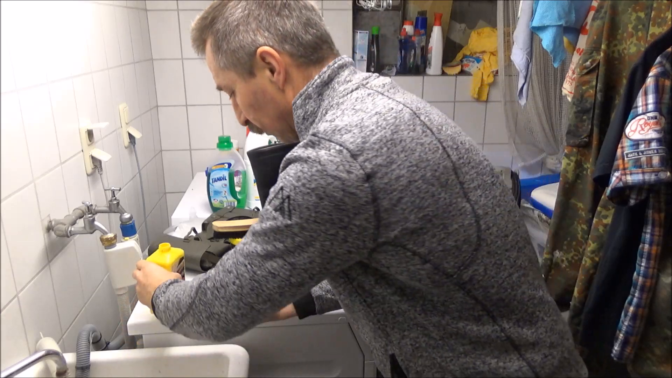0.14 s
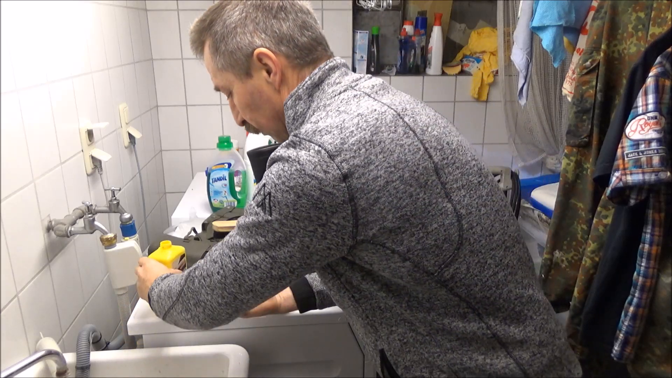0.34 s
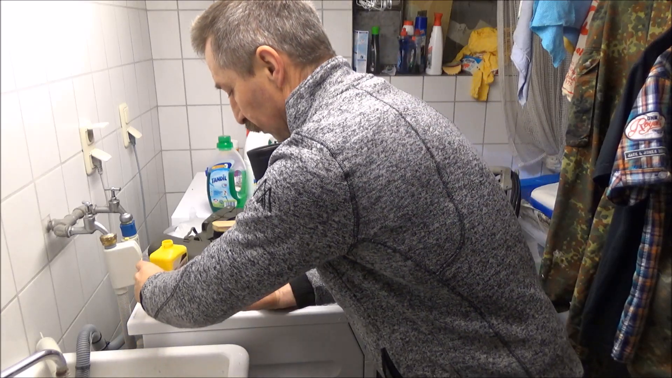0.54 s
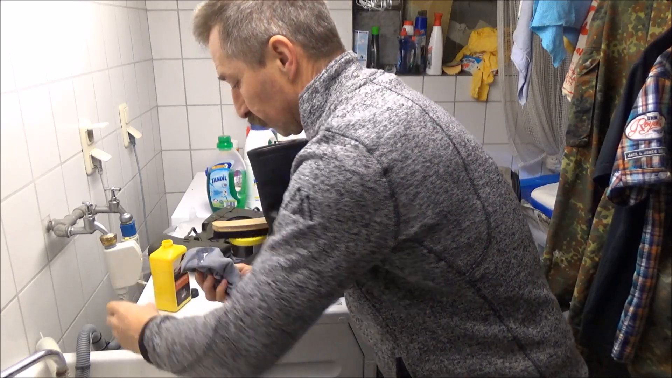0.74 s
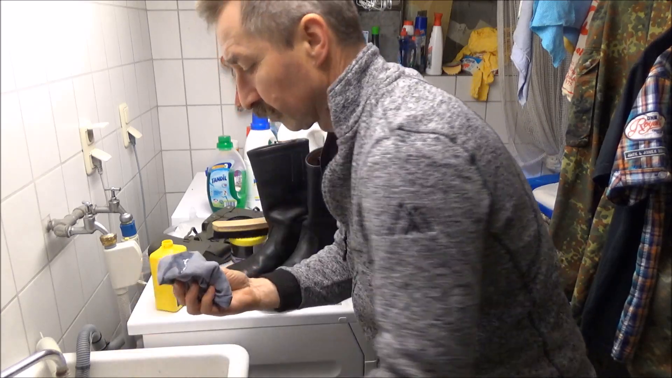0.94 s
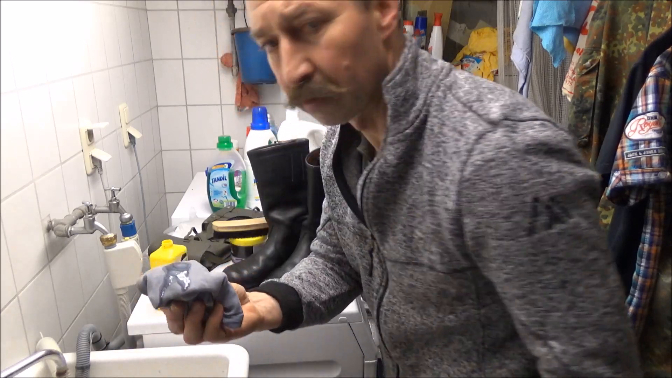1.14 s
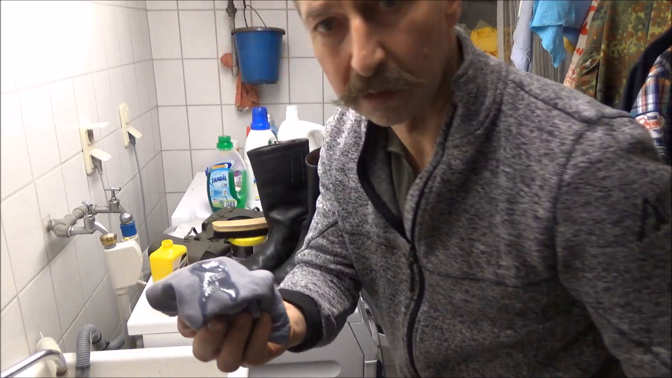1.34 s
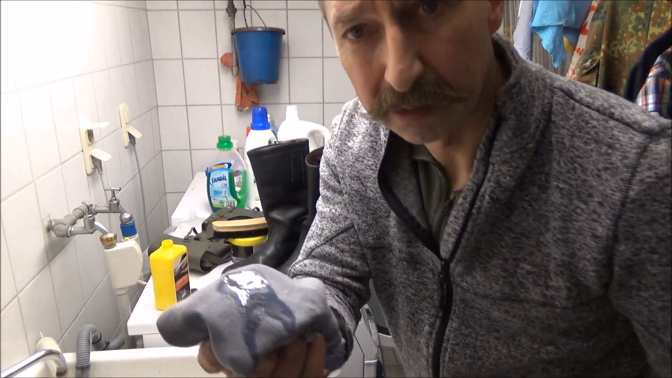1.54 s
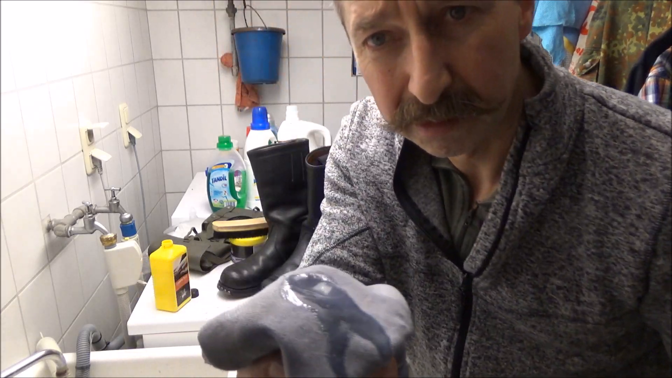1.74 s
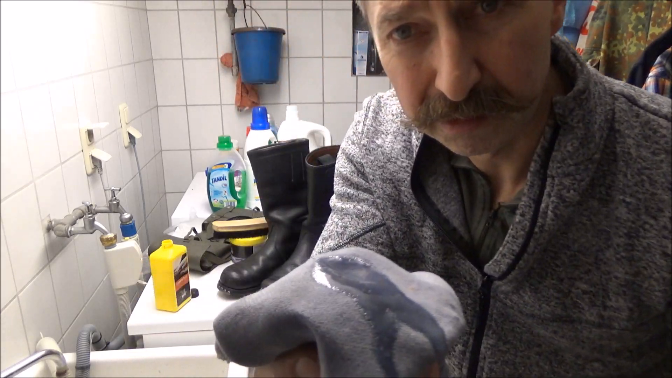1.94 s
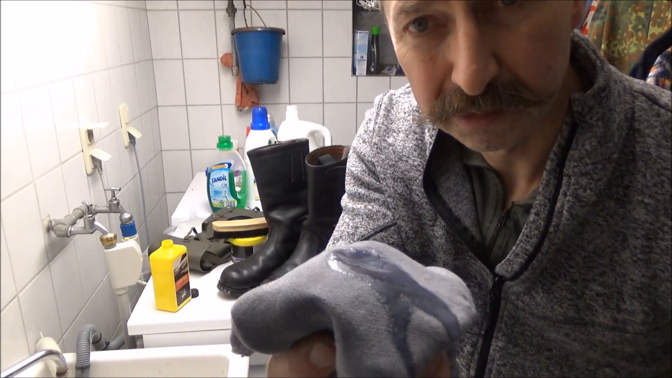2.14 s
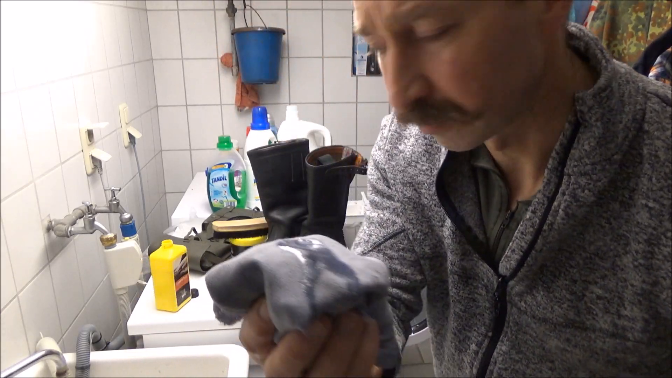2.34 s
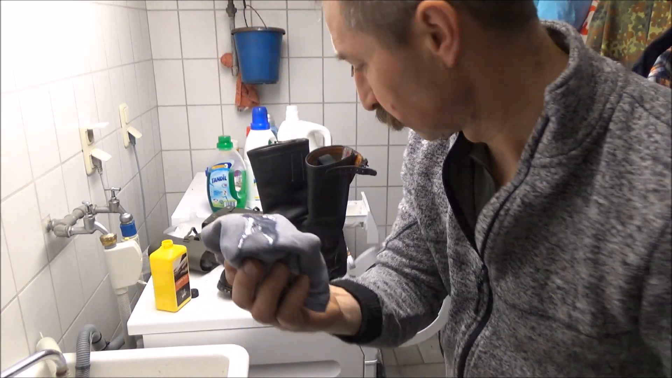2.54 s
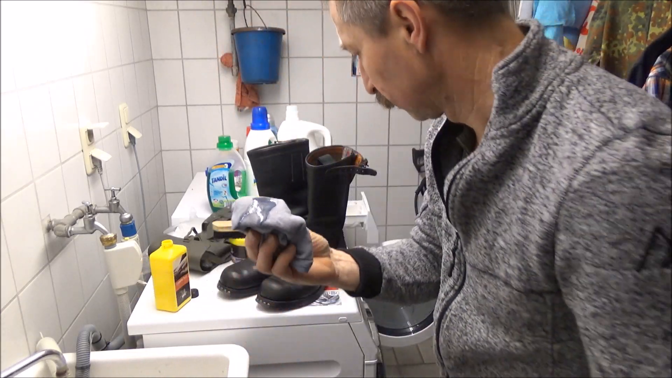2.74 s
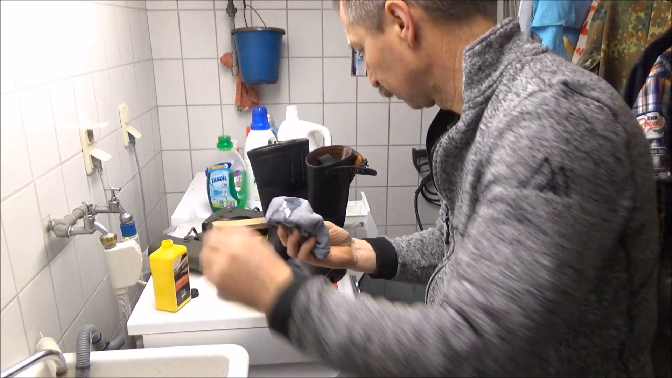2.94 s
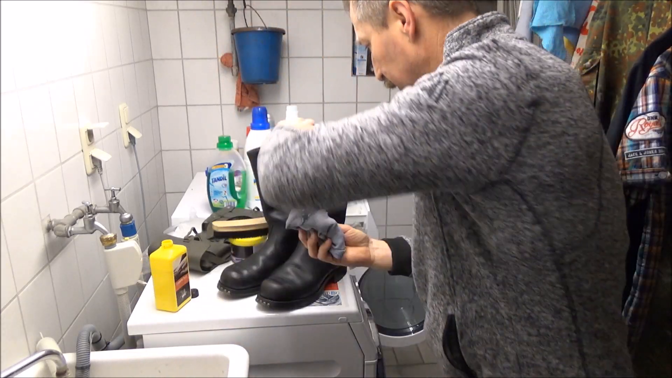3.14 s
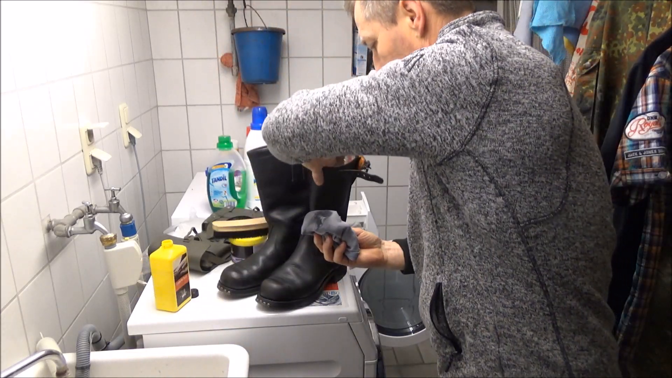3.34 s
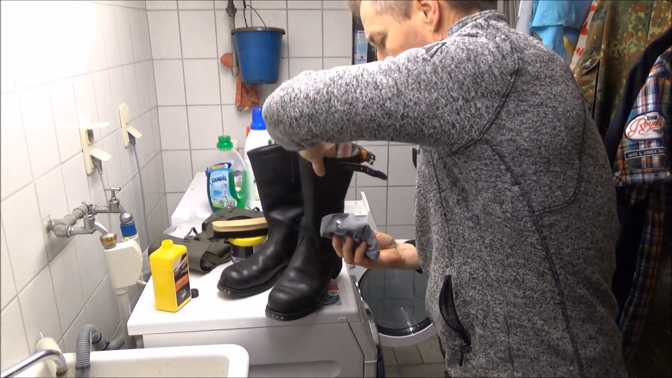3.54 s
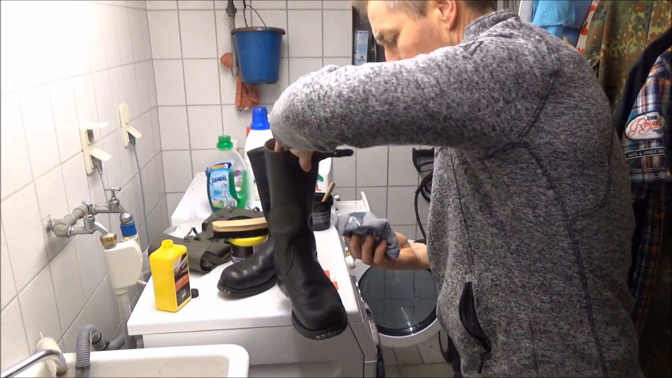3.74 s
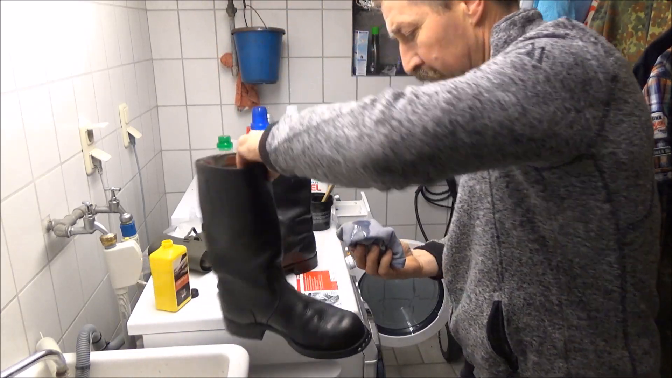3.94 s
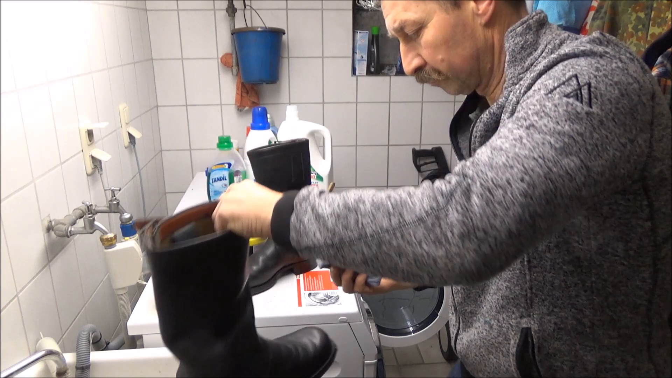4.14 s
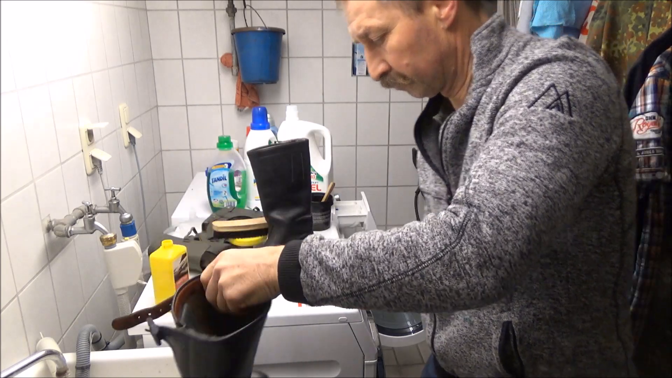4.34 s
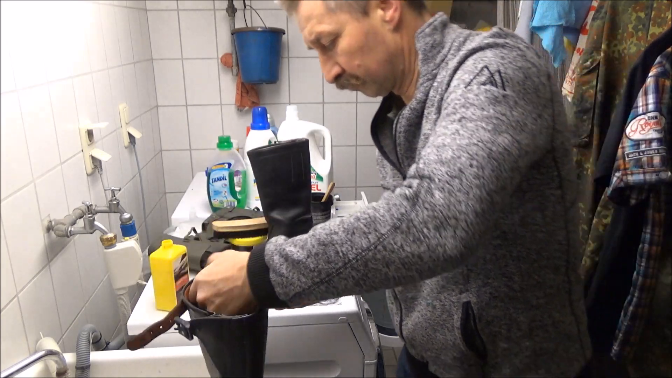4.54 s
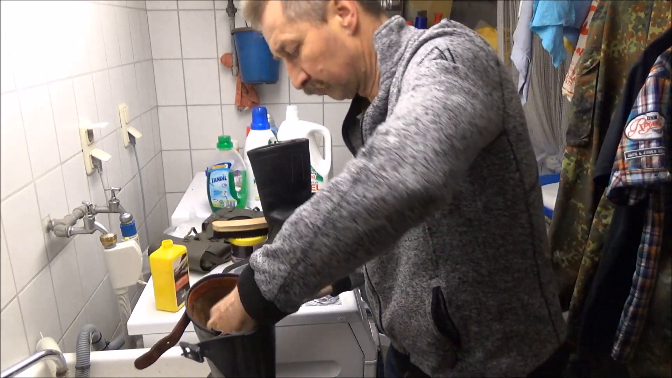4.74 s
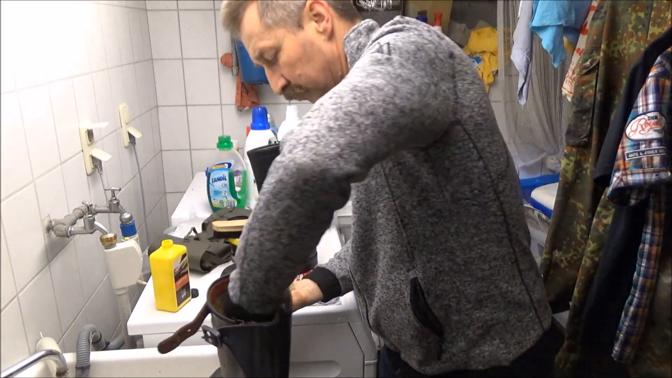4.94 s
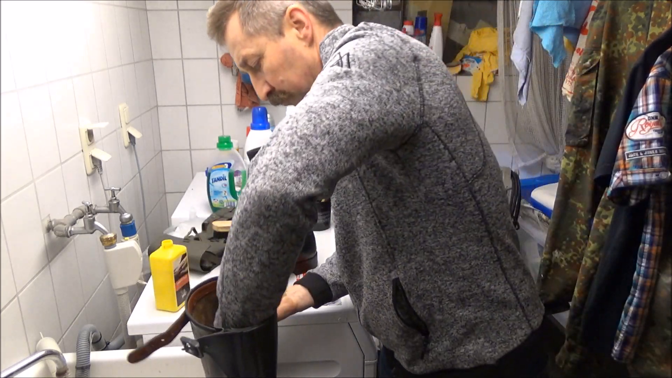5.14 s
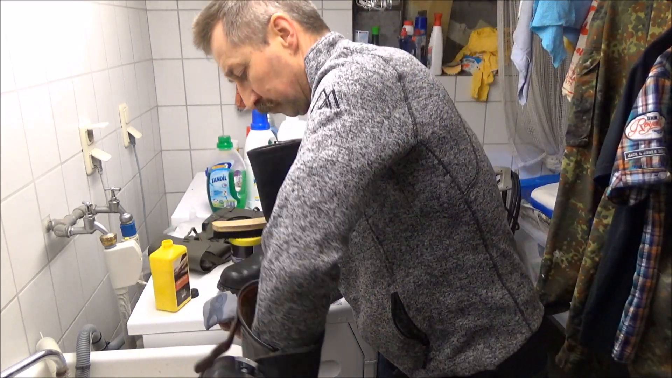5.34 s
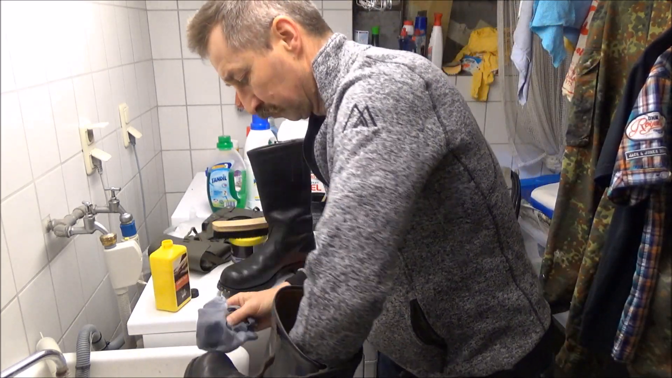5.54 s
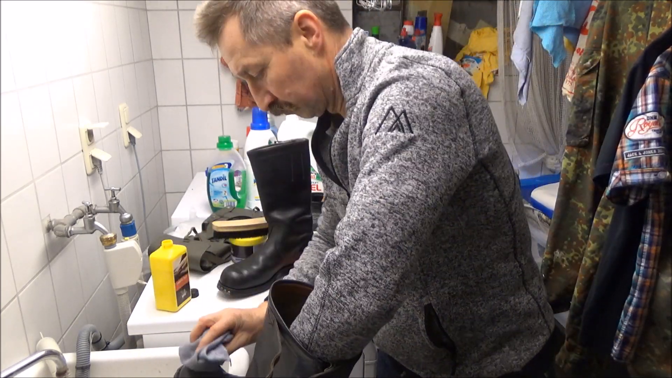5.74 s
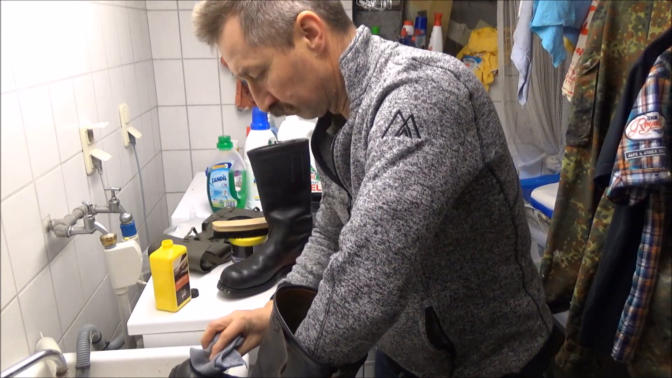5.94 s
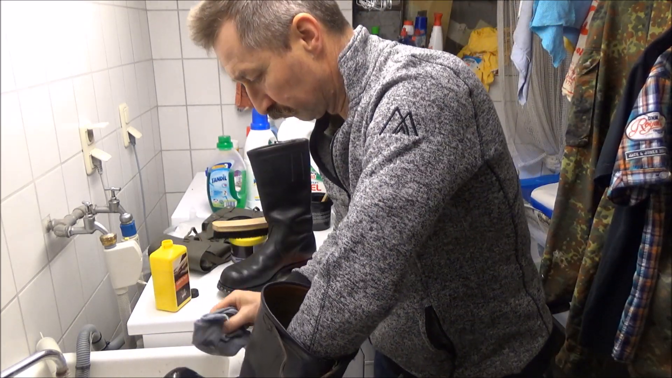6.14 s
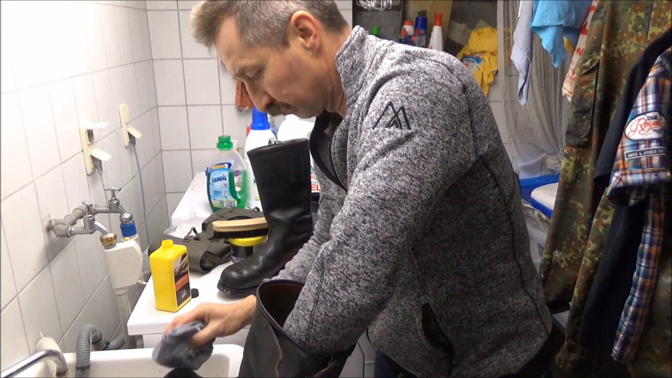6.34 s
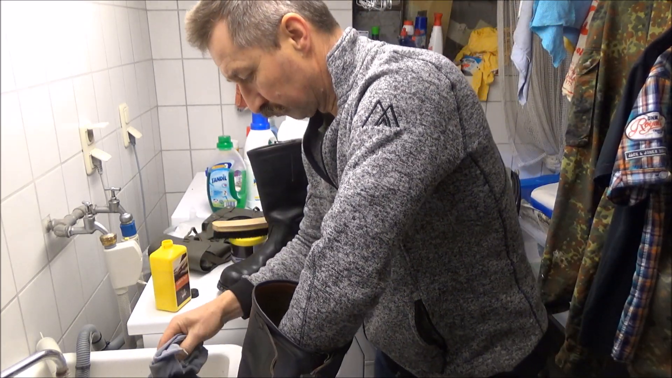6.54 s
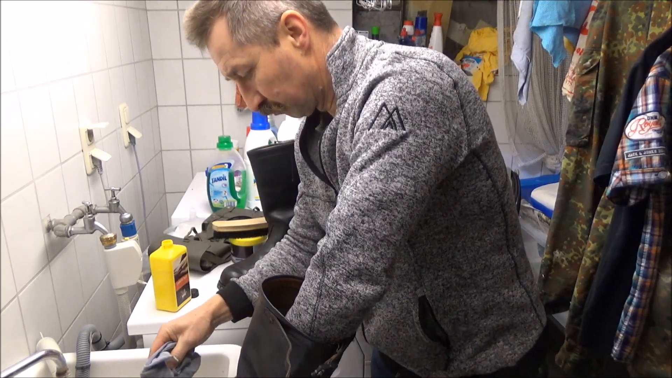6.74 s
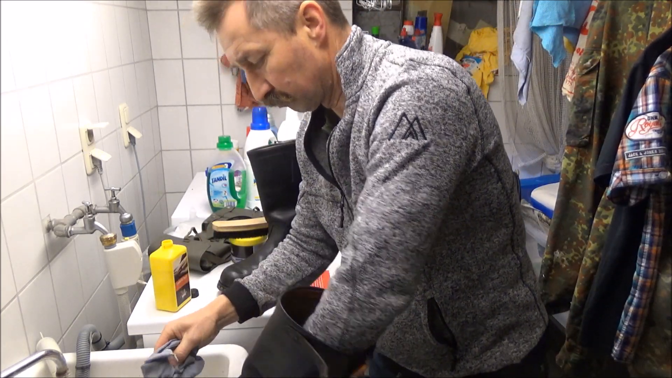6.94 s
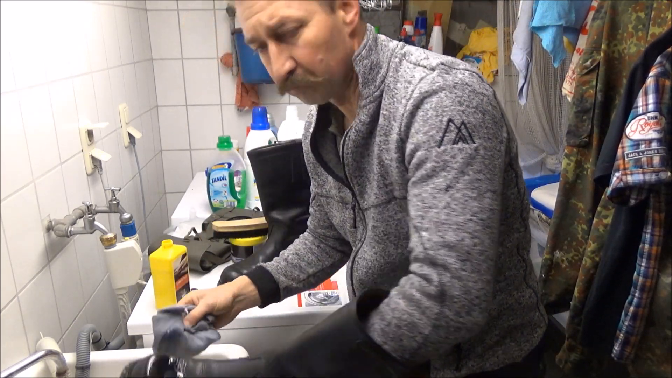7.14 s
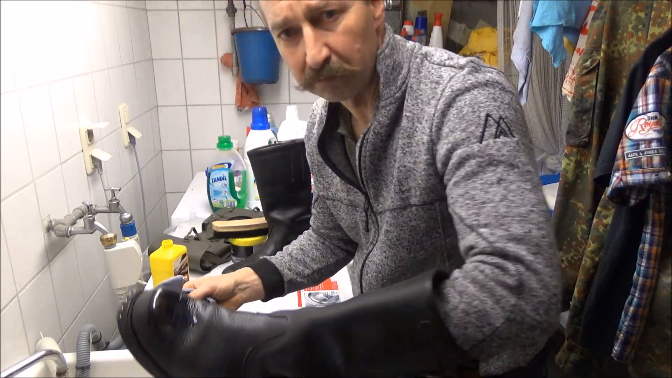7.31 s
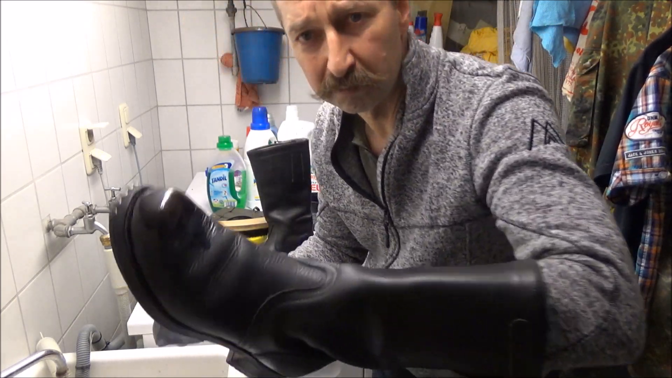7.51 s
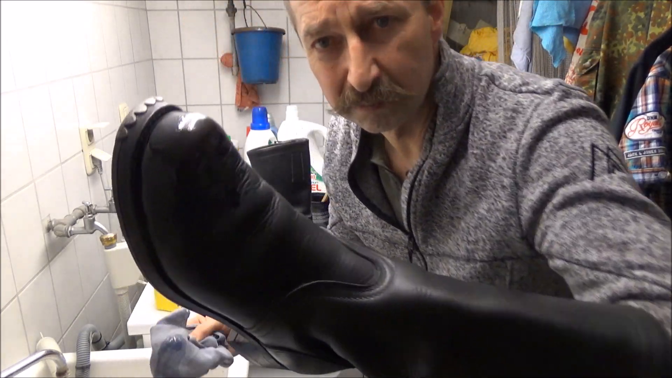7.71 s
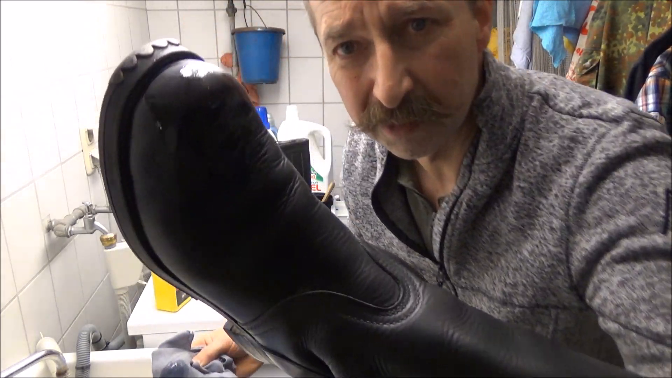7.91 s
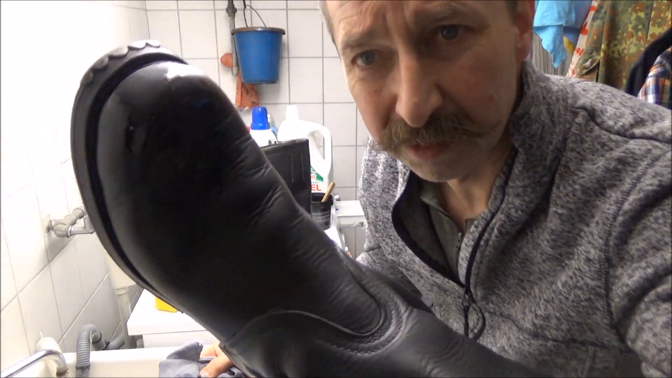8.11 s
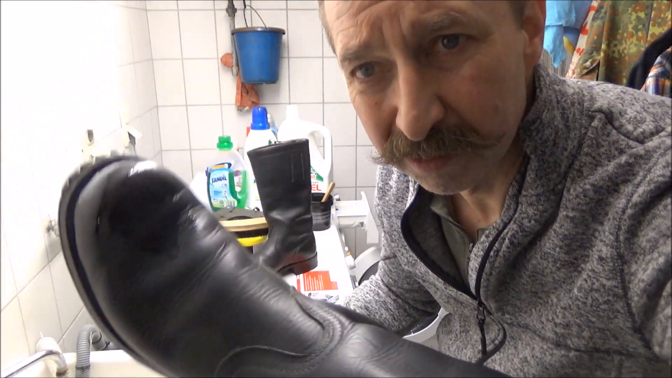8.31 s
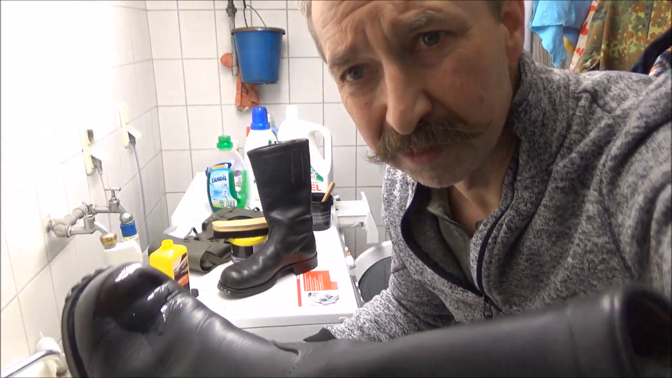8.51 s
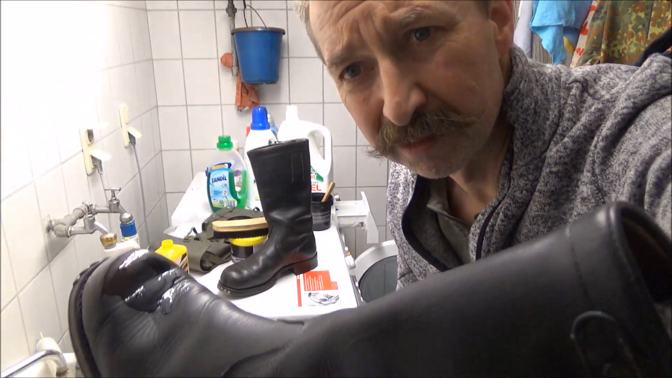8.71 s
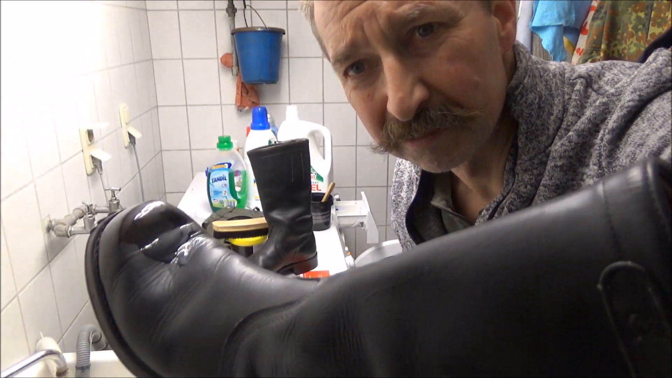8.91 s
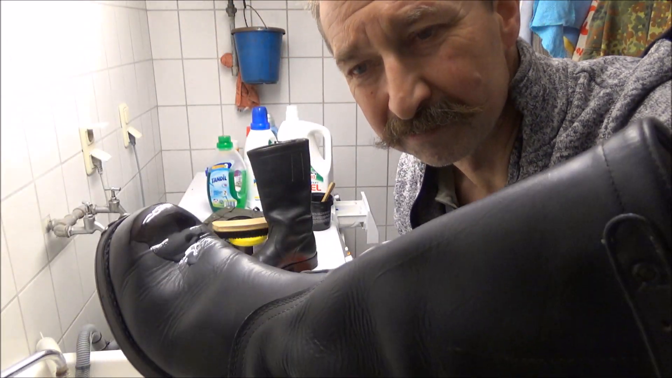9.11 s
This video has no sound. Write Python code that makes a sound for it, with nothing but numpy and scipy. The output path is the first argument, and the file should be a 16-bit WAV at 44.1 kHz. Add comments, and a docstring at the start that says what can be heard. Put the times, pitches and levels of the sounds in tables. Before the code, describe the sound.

In a small tiled washroom with low mains hum, hiss and a thin camera whine, a bottle is set down with dull taps. After a quiet pause, a leather boot snaps and scrapes as it is picked up, then knocks loudly against a sink that rings briefly. A sleeved arm slides into the hollow shaft, ending in a soft thump, followed by faint cloth brushing, a leather snap and a tiny buckle clink. Close stereo microphone, short bright reflections.

```python
"""A small tiled washroom: mains hum, hiss, rumble and a camera's whine and ticking run throughout (shaped noise, sines).
A bottle is set down on a washing machine (low modes and noise puffs); after a pause, leather snaps and scrapes.
A boot is dragged off the machine (grainy friction noise) and knocks on the sink, whose modes ring.
A sleeved arm slides down the hollow shaft (friction through air resonances); light brushing, snaps
and the strap's clinking buckle follow."""
import sys
import numpy as np
from scipy import signal
from scipy.fft import rfft, irfft, next_fast_len
from scipy.io import wavfile
from scipy.ndimage import uniform_filter1d, map_coordinates

SR = 44100
rng = np.random.default_rng(int(sys.argv[2]) if len(sys.argv) > 2 else 0)


def transcribe(signal):
    """Save signal, clipped to [-1, 1], as a 16-bit WAV file at the path in sys.argv[1]."""
    frames = np.atleast_2d(signal).T
    limited = np.clip(frames, -1, 1)
    pcm = np.round(limited * 32767).astype(np.int16)
    wavfile.write(sys.argv[1], SR, pcm)


N = 408807
TIME = np.arange(N) / SR
AGE = np.arange(SR // 2) / SR  # time since a contact, s


def amp(db):
    """Decibels to gain."""
    return 10 ** (np.asarray(db) / 20)


LEFT_OF_CENTRE = amp([[0.4], [-0.4]])  # ear gains: boot and bottle are handled left of centre


def unit(x):
    """Scale to rms 1."""
    return x / np.sqrt(np.mean(x ** 2) + 1e-20)


def along(points, hz):
    """Read (f/Hz, value) points on a log frequency axis."""
    f, v = np.transpose(points)
    return np.interp(np.log(hz + 1), np.log(f + 1), v)


def wobble(rate_hz):
    """Smooth random curve with rate_hz knots a second."""
    coarse = TIME[::32]
    knots = rng.standard_normal(int(N * rate_hz / SR) + 4)
    return np.interp(TIME, coarse, map_coordinates(knots, [coarse * rate_hz]))


def filtered(x, response):
    """Apply a response, given as a function of frequency in Hz."""
    size = x.shape[-1]
    padded = next_fast_len(size + 8192)
    hz = np.fft.rfftfreq(padded, 1 / SR)
    return irfft(rfft(x, padded) * response(hz), padded)[..., :size]


def coloured(x, spectrum):
    """Shape x by a spectrum, then scale to rms 1."""
    return unit(filtered(x, lambda hz: amp(along(spectrum, hz))))


def spread(pair, side_db):
    """Left and right from a middle and a side signal."""
    side = amp(side_db) * pair[1]
    return np.array([pair[0] + side, pair[0] - side])


# Decay of the tiled room: (f/Hz, t60/s)
ROOM_DECAY = [(150, 0.44), (600, 0.32), (2500, 0.2), (6000, 0.25), (14000, 0.15)]


def room_tail(side_db=-8):
    """New stereo response of the tiled walls: noise dying at each band's t60, energy 1 in the left ear."""
    hz, t, z = signal.stft(rng.standard_normal((2, len(AGE))), SR, nperseg=256)
    decay = amp(-60 * t / along(ROOM_DECAY, hz)[:, None])
    tail = signal.istft(z * decay, SR, nperseg=256)[1][:, :len(AGE)]
    tail = spread(tail * (1 - np.exp(-AGE / 0.0011)), side_db)
    return tail / np.linalg.norm(tail[0])


def in_room(x, wet_db):
    """Mono direct sound plus the room's stereo response."""
    return x + amp(wet_db) * signal.fftconvolve(x[None], room_tail(), axes=1)[:, :len(x)]


def struck(x):
    """Scale a blow to rms 1 over its first 25 ms."""
    return x / np.sqrt(np.mean(x[..., :SR // 40] ** 2))


def ring(modes, attack_s, scatter_db, skew_rad):
    """Damped modes at new strengths; each reaches the two ears at a slightly different phase."""
    hz, db, t60_s = np.transpose(modes)[:, :, None]
    size, phase, apart = rng.standard_normal((3, len(modes), 1))
    fade = amp(db + scatter_db * size - 60 * AGE / t60_s) * (1 - np.exp(-AGE / attack_s))
    turn = 2 * np.pi * hz * AGE + 0.5 * phase
    ear_shift = skew_rad * (1 + 0.74 * apart)
    pair = np.array([(fade * np.sin(turn + ear * ear_shift)).sum(0) for ear in (-1, 1)])
    # high-pass at 90 Hz: keeps the scattered starting phases from adding a low splash
    return struck(signal.sosfilt(signal.butter(2, 90, "high", fs=SR, output="sos"), pair))


def burst(spectrum, t60_s, wet_db):
    """Short dying puff of noise in the room."""
    puff = coloured(rng.standard_normal(len(AGE)), spectrum) * amp(-60 * AGE / t60_s)
    return struck(in_room(puff, wet_db))


def add(track, start_s, sound):
    """Mix a sound in at start_s."""
    part = track[:, round(start_s * SR):][:, :sound.shape[1]]
    part += sound[:, :part.shape[1]]


def friction(rate_hz, grain_db, judder_db):
    """Countless fibre slips, single stronger catches among them, and an uneven pressure."""
    catches = (rng.random(N) < rate_hz / SR) * rng.standard_normal(N)
    slips = rng.standard_normal(N) + amp(grain_db) * unit(catches)
    return slips * amp(judder_db * wobble(60))


SPEED_POWER = 0.86  # friction amplitude grows as this power of the sliding speed


def strokes(rows):
    """Each stroke speeds up, holds and slows to rest; a gain per sample for each level column."""
    power = 0
    for start_s, rise_s, hold_s, fall_s, *db in rows:
        corners_s = start_s + np.cumsum([0, rise_s, hold_s, fall_s])
        speed = np.interp(TIME, corners_s, [0, 1, 1, 0])
        power = power + np.outer(amp(db), speed ** SPEED_POWER) ** 2
    return np.sqrt(power)


MAINS_HZ = 49.494
# Mains harmonics: (multiple of MAINS_HZ, rms level/dB)
HUM_HARMONICS = [(1, -46.5), (2, -71), (3, -72.5), (7, -78.5), (10, -73)]
# Relative noise spectra: (f/Hz, level/dB per Hz)
HISS_SPECTRUM = [(120, -12), (200, -4), (438, -3.5), (498, -3.5), (555, -7), (977, -5.5), (1780, -10.5),
                 (3700, -11.5), (4600, -14), (5040, -10.5), (5420, -15), (9540, -15), (15600, -22)]
RUMBLE_SPECTRUM = [(20, -8), (70, 3), (130, 3), (220, -7), (400, -26)]


def background():
    """Steady sines at mains multiples, an even stereo hiss and a faint mono rumble."""
    hum = sum(amp(db) * np.sqrt(2) * np.cos(2 * np.pi * round(k) * MAINS_HZ * TIME)
              for k, db in HUM_HARMONICS)
    hiss = amp(-60.0) * spread(coloured(rng.standard_normal((2, N)), HISS_SPECTRUM), side_db=-5.5)
    rumble = amp(-69.5) * coloured(rng.standard_normal(N), RUMBLE_SPECTRUM)
    return hum + hiss + rumble


WHINE_HZ, WHINE_DB, FLARE_DB = 5060, -72.5, 3.5  # strongest whine, rms level, depth of its random swell
# Weaker whines: (f/Hz, rms level/dB)
WHINE_TONES = [(1980, -79.5), (2127, -84), (2962, -81), (3088, -82), (6632, -85), (7800, -85)]


def whine_tone(hz):
    """Sine wavering at random in level and phase, at rms 1."""
    level = amp(4.6 * wobble(16))
    return unit(level * np.sin(2 * np.pi * hz * TIME + 0.426 * wobble(11)))


def camera():
    """A thin wavering whine, and a tiny tick of tone and rasp at every frame, 25 a second."""
    flaring = unit(amp(FLARE_DB * wobble(5)) * whine_tone(WHINE_HZ))
    whine = sum(amp(db) * whine_tone(hz) for hz, db in WHINE_TONES) + amp(WHINE_DB) * flaring
    since_frame_s = (TIME - 0.0155) % (1 / 25)
    swell = since_frame_s * np.exp(-since_frame_s / 0.0022)
    rasp_spectrum = [(2000, -20), (3000, -5), (3700, -2), (4300, -17), (7000, -46)]
    rasp = coloured(rng.standard_normal(N), rasp_spectrum)
    tick = swell * (np.sin(2 * np.pi * 3680 * TIME) + 1.13 * rasp)
    return whine + amp(-71.0) * unit(tick)


# Snaps of leather and strap: (t/s, level/dB, centre f/Hz, relative bandwidth)
SNAP_EVENTS = [(2.43, -55, 8500, 1.0), (2.707, -42.5, 1680, 0.82), (3.4031, -45, 2900, 0.83),
               (4.181, -42, 2940, 0.41), (5.415, -57.5, 9000, 1.0), (6.867, -39, 2850, 1.94),
               (7.655, -55, 1600, 1.5), (7.774, -57.5, 6000, 1.2), (7.847, -53.5, 2800, 1.6),
               (7.997, -57, 4970, 0.65), (8.136, -58.5, 1200, 0.88)]
# Relative snap spectrum: (multiple of the centre at bandwidth 1, level/dB)
SNAP_SHAPE = [(.125, -41), (.5, -6.5), (1, -3.5), (1.27, -3.5), (1.7, -10.5), (2.3, -30), (5, -53)]
# Clinks of the strap's buckle: (t/s, level/dB)
BUCKLE_CLINKS = [(7.91, -57), (7.932, -53)]
# Buckle modes: (f/Hz, relative level/dB, t60/s)
BUCKLE_MODES = [(3360, 9, .11), (7040, -13, 0.11), (7854, -8, 0.12), (8830, 2, 0.055)]


def clicks():
    """Stiff leather and its strap snap as band-shaped puffs; the buckle clinks on its modes."""
    out = np.zeros((2, N))
    for start_s, db, hz, width in SNAP_EVENTS:
        colour = [(hz * ratio ** width, level_db) for ratio, level_db in SNAP_SHAPE]
        add(out, start_s, amp(db) * burst(colour, t60_s=0.028, wet_db=-3.5))
    for start_s, db in BUCKLE_CLINKS:
        add(out, start_s, amp(db) * ring(BUCKLE_MODES, attack_s=0.0043, scatter_db=6, skew_rad=0.2))
    return out


# Soft contacts of bottle, boot and hand: (t/s, thud level/dB, knock level/dB), before ear gains
SOFT_CONTACTS = [(0.254, -38.5, -36.5), (0.293, -42.5, -46), (0.319, -44.5, -45), (0.384, -57, -45.5),
                 (2.794, -70, -46.5), (3.328, -59, -50), (3.357, -51, -45.5), (3.39, -55, -59),
                 (3.44, -52.5, -62), (4.98, -56, -42), (5.065, -50, -46), (5.195, -62, -49),
                 (5.279, -35, -43.5), (5.502, -54, -55.5), (6.718, -54, -68), (6.868, -51.5, -53),
                 (7.515, -61, -54.5), (7.654, -64, -48.5)]
# Modes of the machine's top: (f/Hz, relative level/dB, t60/s)
TOP_MODES = [(108.6, 1, 0.2), (137, 3, 0.23), (177, -3, 0.2), (209, -2, 0.25), (262.5, -6, 0.28)]
# Relative spectra of knock and pat: (f/Hz, level/dB per Hz)
SOFT_KNOCK_SPECTRUM = [(60, -24), (160, -5.5), (280, -5.5), (450, 0.5), (650, -1.5), (850, -9.5),
                       (1300, -15), (2000, -39), (5000, -45)]
PAT_SPECTRUM = [(400, -23), (1200, 4), (2200, -1), (4000, -10), (7000, -18), (14000, -43)]
PAT_DB = -10  # re the knock


def bumps():
    """Dull contacts: a low modal thud, a short knock and a soft pat."""
    out = np.zeros((2, N))
    padding = 1 - np.exp(-AGE / 0.0027)  # softens the first instant
    for start_s, thud_db, knock_db in SOFT_CONTACTS:
        thud = amp(thud_db) * ring(TOP_MODES, attack_s=0.0017, scatter_db=4, skew_rad=0.059)
        knock = amp(knock_db) * burst(SOFT_KNOCK_SPECTRUM, t60_s=0.063, wet_db=-3.0)
        pat = amp(knock_db + PAT_DB) * burst(PAT_SPECTRUM, t60_s=0.044, wet_db=-4.5)
        add(out, start_s, LEFT_OF_CENTRE * (thud + (knock + pat) * padding))
    return out


# Arm strokes: (t/s, rise/s, hold/s, fall/s, hollow level/dB, sleeve hiss level/dB), before trims
ARM_STROKES = [ (4.66, 0.27, .4, .32, -51, -62), (4.83, 0.016, 0.013, 0.032, -43, -72),
               (4.96, .06, 0.11, .05, -44.5, -76), (5.12, 0.15, 0.038, 0.041, -45.5, -48.5), ]
# Air resonances in the boot: (f/Hz, width/Hz, relative level/dB)
SHAFT_RESONANCES = [(222, 43, 6.5), (385, 57, -5.5), (581, 63, 5), (900, 120, -51)]
# Relative spectrum of knit on the lining: (f/Hz, level/dB per Hz)
SLEEVE_SPECTRUM = [(3000, -4), (6000, -2.5), (10000, -4), (13000, -3), (15500, -9)]


def tube(hz):
    """Air resonances of the shaft, summed with alternating sign."""
    return sum((-1) ** k * amp(db) * 1j * hz * width / (centre * centre - hz * hz + 1j * hz * width)
               for k, (centre, width, db) in enumerate(SHAFT_RESONANCES))


def shaft():
    """The sleeve sliding into the boot hisses on the lining and excites the hollow leather tube."""
    slips = friction(rate_hz=180, grain_db=-3.5, judder_db=1.5)
    hollow_gain, hiss_gain = strokes(ARM_STROKES)
    sleeve = hiss_gain * coloured(friction(rate_hz=580, grain_db=-14, judder_db=2.8), SLEEVE_SPECTRUM)
    hollow = amp(-4) * hollow_gain * unit(filtered(slips, tube))
    return LEFT_OF_CENTRE * in_room(hollow + sleeve, wet_db=-10.5)


BEND_HZ = 2860  # scrape resonance with the leather at rest
# Bending slides that resonance: (t/s, length/s, from f/Hz, to f/Hz)
BEND_SLIDES = [(2.69, 0.1, 1600, 5000), (4.102, .145, 2790, 946)]


def bent(x, peak_db, octaves, patchy_db):
    """Lift a band that follows the bending leather; passing creases colour the sound in patches."""
    hz, t, z = signal.stft(x, SR, nperseg=512)
    centre_hz = np.full(len(t), float(BEND_HZ))
    for start_s, length_s, from_hz, to_hz in BEND_SLIDES:
        during = (t > start_s) & (t < start_s + length_s)
        centre_hz[during] = from_hz + (to_hz - from_hz) * (t[during] - start_s) / length_s
    off = np.log2((hz[:, None] + 1) / centre_hz) / octaves
    creases = uniform_filter1d(rng.standard_normal(z.shape), size=4, axis=0)
    creases = uniform_filter1d(creases, size=7, axis=1)
    gain_db = peak_db * (np.exp(-off ** 2) - 0.64) + patchy_db * unit(creases)
    return signal.istft(z * amp(gain_db), SR, nperseg=512)[1][:N]


# Strokes: (t/s, rise/s, hold/s, fall/s, dull level/dB, scrape level/dB, hiss level/dB), before trims
LEATHER_STROKES = [ (0.28, 0.014, 0.091, 0.12, -51.5, -51, -62),
                   (2.697, 0.016, 0.049, 0.072, -48.5, -42, -49),
                   (2.73, 0.028, 0.0096, 0.026, -56, -35.5, -50.5),
                   (3.38, 0.024, 0.067, 0.091, -50.5, -47, -62), (3.43, .13, 0.27, 0.085, -61, -40, -46),
                   (3.62, .1, 0.091, 0.074, -45, -39.5, -48.5), (3.83, 0.045, 0.24, .05, -60, -61.5, -60),
                   (4.08, 0.056, 0.042, 0.047, -54, -37.5, -50), (4.13, 0.096, 0.023, .03, -43, -48, -50.5),
                   (4.264, 0.022, 0.018, 0.03, -38, -32.5, -44), (4.45, 0.061, 0.17, 0.21, -63, -60, -61),
                   (4.63, 0.22, 0.28, .27, -54, -52.5, -54.5), (5.1, 0.18, 0.024, 0.077, -40.5, -47, -46.5),
                   (5.35, 0.062, .08, 0.66, -58.5, -58, -65.5), ]
# Light brushing of sleeve and rag, same columns; its dull part is the jacket
BRUSH_STROKES = [ (0.9, .35, 0.19, .5, -68, -69, -70), (3.0, .16, 0.16, 0.099, -73, -68, -60.5),
                 (6.04, 0.073, 0.04, 0.14, -57, -68, -70), (6.42, 0.11, 0.33, .1, -58, -59, -67.5),
                 (6.92, 0.085, 0.035, 0.089, -57, -56, -50.5), (7.04, 0.069, .1, 0.18, -77, -59.5, -61),
                 (7.36, 0.3, 0.27, .1, -62, -59.5, -62.5), (7.895, 0.021, 0.019, .03, -51, -55, -57),
                 (7.95, 0.1, 0.13, .4, -58.5, -70, -72), (9.07, .08, .1, .05, -73, -64, -72), ]
# Relative spectra: (f/Hz, level/dB per Hz)
DRAG_SPECTRUM = [(150, -32), (350, -16), (550, -3), (850, -3.5), (1250, -2.5), (2200, -17.5), (5000, -58)]
SCRAPE_SPECTRUM = [(250, -36), (600, -25), (1300, -19), (2000, 2), (2800, -3), (3800, 0), (5500, -6),
                   (7500, -12), (12000, -31)]
JACKET_SPECTRUM = [(100, -9), (240, -9.5), (370, -1), (600, -5.5), (1200, -6.5), (2200, -21), (5000, -55)]
CLOTH_SPECTRUM = [(250, -15), (900, -5), (3000, -5), (5500, -1.5), (7000, -4), (8300, -3.5), (10000, -1),
                  (12000, -9.5), (15500, -21)]


def rubbing():
    """Leather drags and scrapes, the jacket shifts dully, and the finer cloth fibres hiss above both."""
    rub, brush = strokes(LEATHER_STROKES), strokes(BRUSH_STROKES)
    _, scrape_gain, hiss_gain = np.hypot(rub, brush)
    slips = friction(rate_hz=400, grain_db=-2, judder_db=1.4)
    drag = amp(-2.0) * rub[0] * coloured(slips, DRAG_SPECTRUM)
    scrape = amp(-2.0) * scrape_gain * coloured(slips, SCRAPE_SPECTRUM)
    jacket = amp(-2.0) * brush[0] * coloured(slips, JACKET_SPECTRUM)
    fibres = friction(rate_hz=650, grain_db=-6.5, judder_db=1.0)
    cloth = amp(1.73) * hiss_gain * coloured(fibres, CLOTH_SPECTRUM)
    leather = bent(drag + scrape, peak_db=4.5, octaves=0.21, patchy_db=2.0)
    return amp(-1.6) * in_room(leather + jacket + cloth, wet_db=-3)


# Boot on sink: (t/s, thud level/dB, ring level/dB, slap level/dB), ring before trims
SINK_KNOCKS = [(4.3545, -19, -13.5, -32.5), (4.401, -29.5, -25.5, -35), (4.426, -32, -25, -49),
               (4.446, -39, -35, -50), (4.524, -39.5, -36.5, -56), (4.589, -60, -46, -52.5),
               (4.837, -46, -49.5, -52)]
# Sink modes, low and main: (f/Hz, relative level/dB, t60/s)
SINK_LOW_MODES = [(122.5, -10, 0.21), (149.6, -2, 0.082), (186, 4, 0.095), (222.6, 1.5, 0.28),
                  (276, -6, 0.24)]
SINK_MODES = [(333, -18, 0.35), (407.6, -3, 0.12), (434.6, -13.5, 0.23), (609, 0, 0.306), (658, -2, 0.27),
              (720, -5.5, 0.12), (835, -6, 0.13), (930, -21.5, 0.16), (1027, -18, .25), (1193, -19, .24),
              (1395, -22.5, 0.28), (1564, -20.5, .22)]
# Relative spectra of wall knock and slap: (f/Hz, level/dB per Hz)
WALL_SPECTRUM = [(60, -38), (200, 2.5), (350, 2.5), (600, 5), (850, -1), (1300, -9), (2000, -25),
                 (5000, -46.5)]
SLAP_SPECTRUM = [(400, -30), (1300, 8), (2500, -2), (4200, -2), (7000, -11.5), (10000, -18.5), (16000, -40)]
# contact time of a blow with ring level HARD_DB; weaker blows press for longer
CONTACT_S, HARD_DB, SOFTENING = 0.0018, -19, 0.28


def knocks():
    """The heavy sole hits the sink, which rings on its modes; weaker blows build up more slowly."""
    out = np.zeros((2, N))
    for start_s, thud_db, ring_db, slap_db in SINK_KNOCKS:
        contact_s = CONTACT_S * amp(HARD_DB - ring_db) ** SOFTENING
        thud = amp(thud_db) * ring(SINK_LOW_MODES, attack_s=contact_s, scatter_db=1, skew_rad=0.28)
        wall = amp(-6) * burst(WALL_SPECTRUM, t60_s=0.036, wet_db=-5) * (1 - np.exp(-AGE / contact_s))
        basin = amp(-3.0) * ring(SINK_MODES, attack_s=2 * contact_s, scatter_db=2.5, skew_rad=0.21)
        slap = amp(slap_db) * burst(SLAP_SPECTRUM, t60_s=0.059, wet_db=0.0)
        ringing = amp(ring_db) * (basin + wall) * amp([[1.3], [-1.3]])  # left of centre
        add(out, start_s, thud + ringing + slap)
    return out


def scene():
    """All the handling over the steady background."""
    return rubbing() + shaft() + knocks() + bumps() + clicks() + camera() + background()


# Microphone pair: (f/Hz, side gain/dB)
STEREO_WIDTH = [(40, -20), (130, -4.5), (1000, 4), (2200, 3), (4500, 1.5), (8000, -1), (10500, -7.5),
                (12000, -36.5)]
TOP_HZ = 15750  # band limit


def record(dry):
    """Microphone pair: wide in the middle range, near mono in the top treble, nothing above TOP_HZ."""
    left, right = dry
    side = filtered((left - right) / 2, lambda hz: amp(along(STEREO_WIDTH, hz)))
    return filtered((left + right) / 2 + np.array([side, -side]), lambda hz: hz < TOP_HZ)


dry = scene()
out = record(dry)
transcribe(out)
```